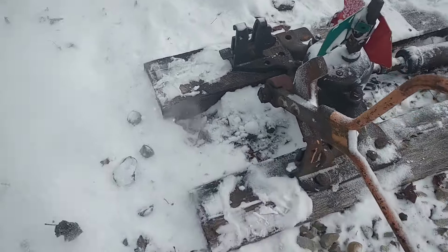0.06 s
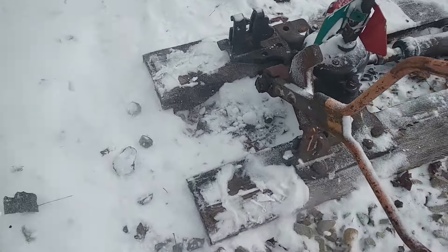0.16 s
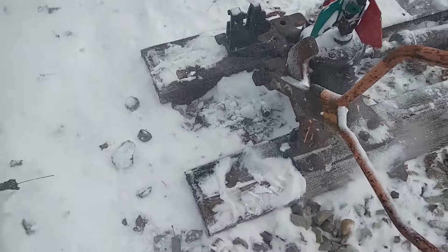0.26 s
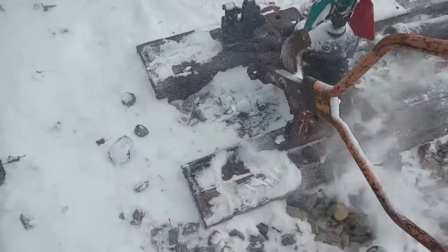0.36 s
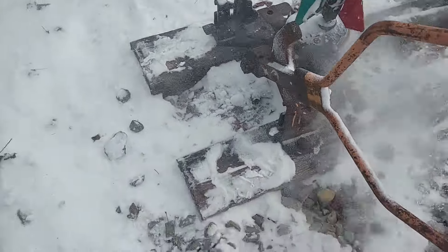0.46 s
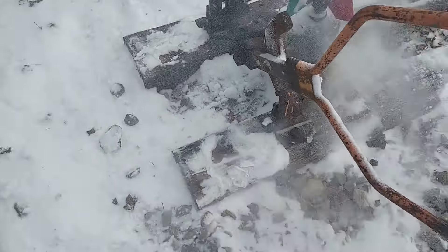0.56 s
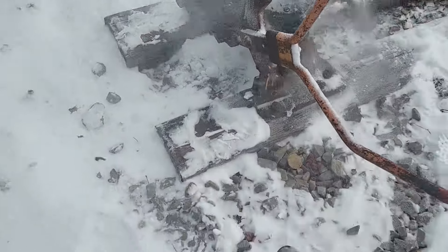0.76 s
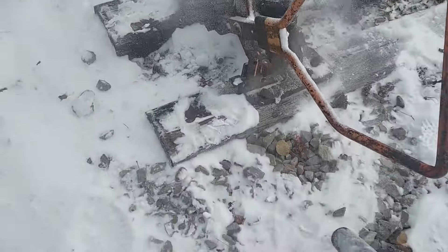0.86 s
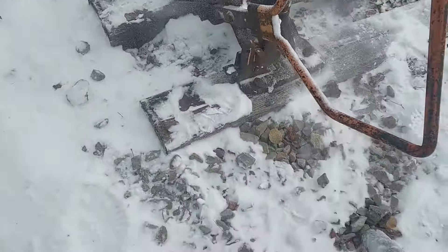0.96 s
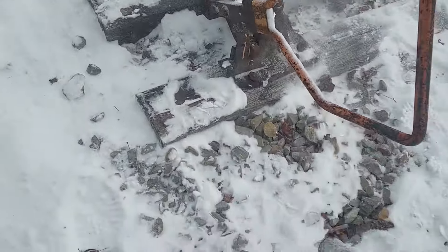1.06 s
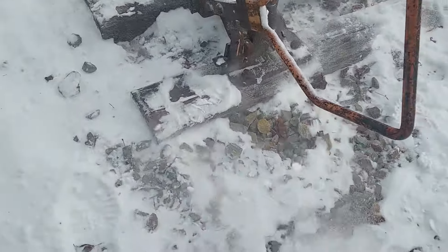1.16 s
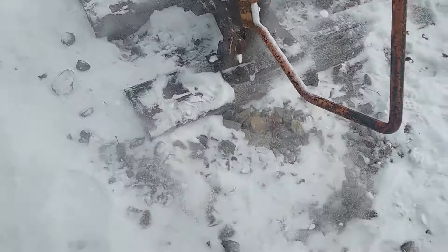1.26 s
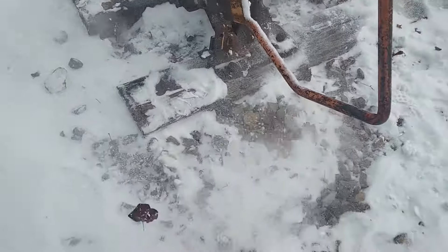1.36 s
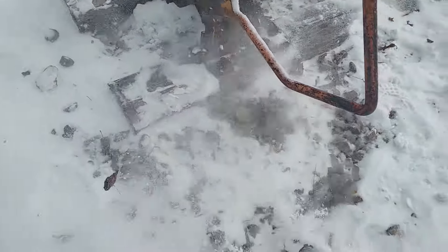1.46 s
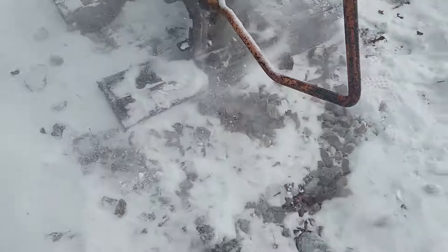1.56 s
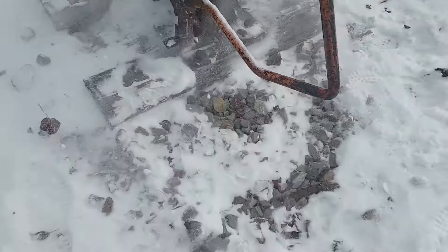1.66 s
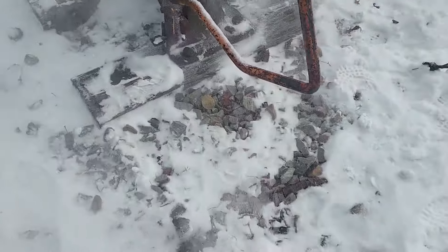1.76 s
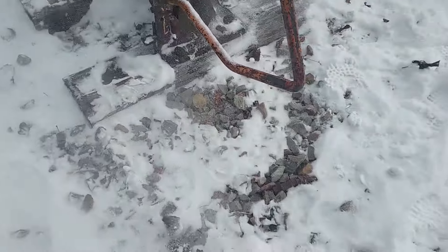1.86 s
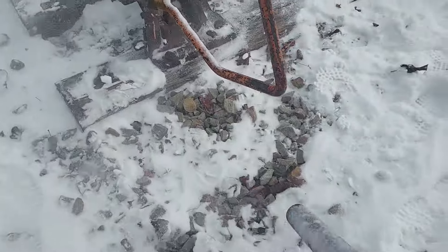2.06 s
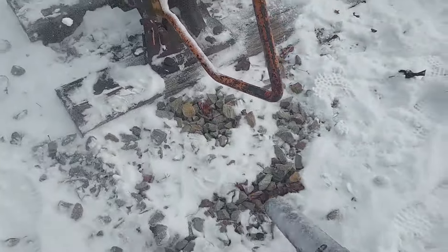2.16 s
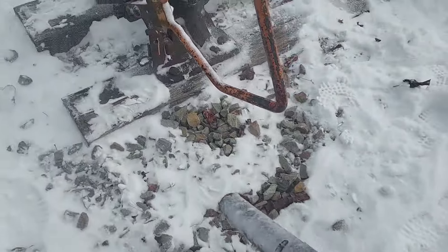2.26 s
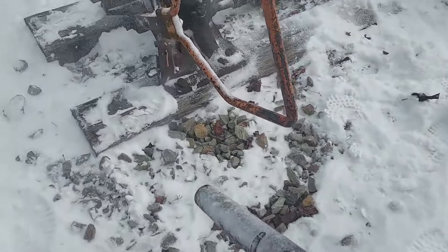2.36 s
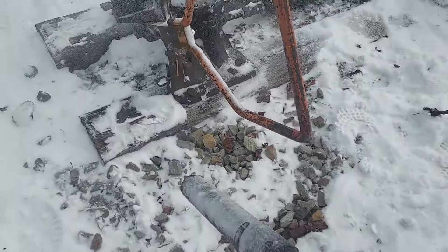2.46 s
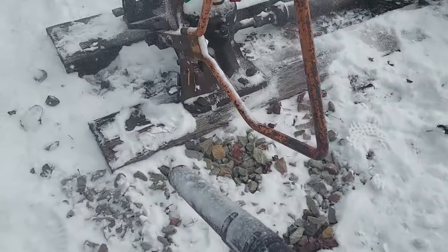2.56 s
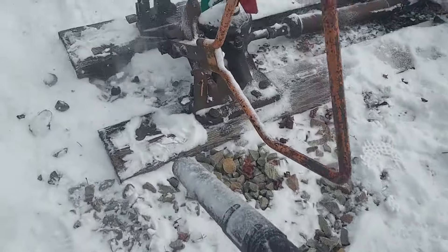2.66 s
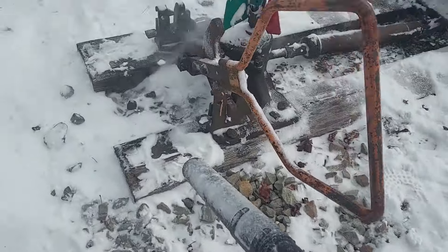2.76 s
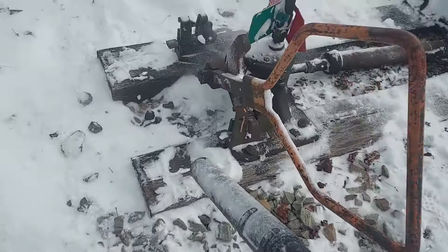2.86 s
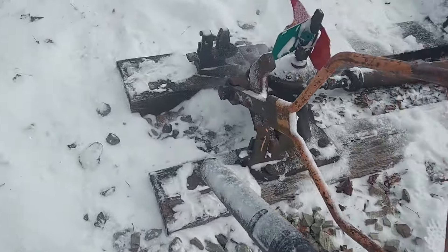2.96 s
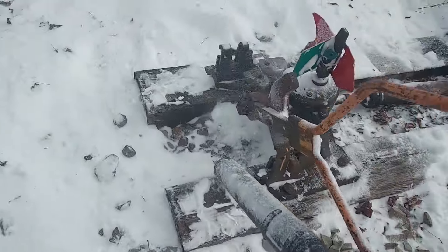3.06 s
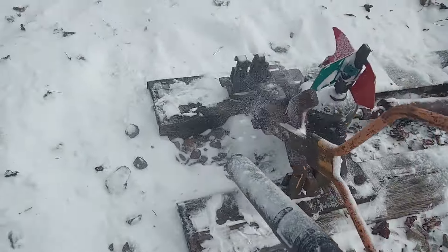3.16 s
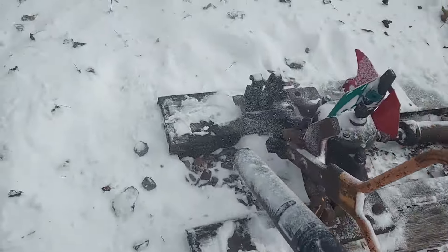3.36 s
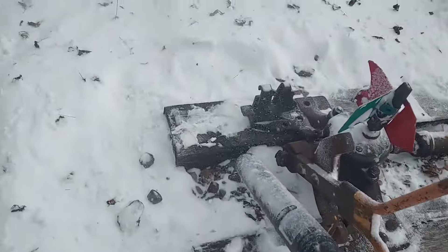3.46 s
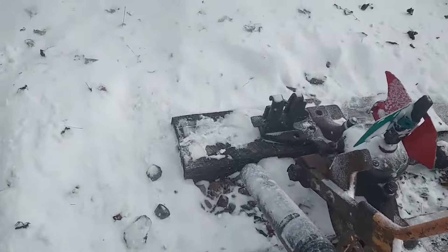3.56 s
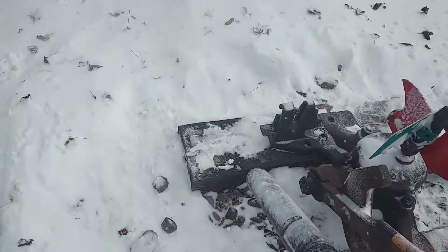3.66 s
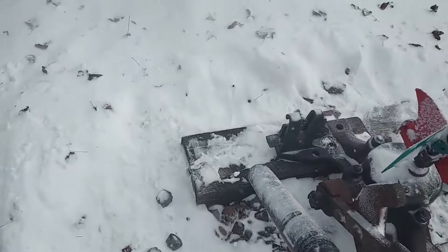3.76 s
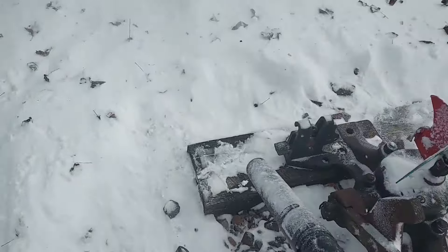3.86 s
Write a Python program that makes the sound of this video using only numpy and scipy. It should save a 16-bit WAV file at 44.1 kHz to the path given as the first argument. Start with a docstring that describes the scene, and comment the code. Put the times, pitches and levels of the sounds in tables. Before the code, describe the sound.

Loud and close, a leaf blower drones outdoors at a nearly constant pitch, mixing a petrol engine's buzz with rushing air and thin whistles that come and go. A little wind rumble touches the microphone, mostly on the left. Late on, the motor stumbles and sags briefly, then climbs back to speed amid several low thumps of air.

```python
"""A loud buzz, whine and roar: a petrol backpack blower runs flat out, close to two microphone ports.
One cylinder fires on every turn, a fourteen-blade fan whines on the same shaft, air roars from the tube.
Near the end the engine misses a few firings, sags and picks up again; stray air buffets the left port.
The engine sound is a stack of "orders": order 3 is a tone that vibrates three times per shaft turn."""
import sys
import numpy as np
from scipy import signal
from scipy.fft import rfft, irfft
from scipy.io import wavfile
from scipy.ndimage import uniform_filter1d

SR = 44100
rng = np.random.default_rng(int(sys.argv[2]) if len(sys.argv) > 2 else 0)


def output_pcm(signal):
    """Save a mono or channel-first signal as 16-bit PCM at the path in sys.argv[1].

    Samples are clipped to [-1, 1] before scaling.
    """
    pcm = np.clip(np.atleast_2d(signal).T, -1, 1) * 32767
    wavfile.write(sys.argv[1], SR, np.round(pcm).astype(np.int16))


N = 391519
HOP, WINDOW = 256, 1024  # samples between frames, samples in one slice of noise
TONE_TIMES, NOISE_TIMES = (np.arange(N // HOP + extra) * HOP / SR for extra in (2, 5))
NOISE_HZ = np.fft.rfftfreq(WINDOW, 1 / SR)
BLADES, ORDERS = 14, np.arange(1, 57)

# Shaft speed, nearly steady until the sag after the missed firings: time_s, turns_hz
SHAFT_SPEED = [(0.0, 114.2), (0.12, 113.5), (0.22, 114.0), (0.64, 113.6), (0.84, 114.2), (1.41, 113.6),
               (1.56, 114.2), (1.67, 113.4), (1.85, 114.2), (2.2, 113.5), (2.59, 114.3), (2.91, 113.9),
               (3.21, 114.4), (3.34, 113.6), (3.58, 114.5), (3.68, 113.8), (3.85, 114.2), (4.0, 113.7),
               (4.15, 114.4), (4.25, 113.8), (4.4, 114.9), (4.5, 114.1), (4.81, 114.3), (4.91, 115.4),
               (5.16, 115.0), (5.26, 115.6), (5.44, 114.0), (6.0, 114.2), (6.07, 114.8), (6.27, 115.1),
               (6.82, 113.4), (7.11, 114.0), (7.21, 113.1), (7.27, 113.1), (7.36, 104.8), (7.44, 101.5),
               (7.5, 102.7), (7.58, 106.8), (7.68, 110.3), (7.76, 111.3), (8.2, 112.2), (8.35, 109.9),
               (8.4, 110.0), (8.57, 112.8), (8.87, 113.9)]
# How the air roar and casing buzz change; roar and lean count only as changes from their average.
# The treble band is a faint high band near 9 kHz that slowly swells and fades:
# time_s, roar_db, lean_left_db, treble_band_db, buzz_left_db, buzz_right_db
ROAR_AND_BUZZ = [(0.0, -25, -4, -14, -71, -40.5), (0.5, -25.5, -3, -11, -58, -45),
                 (1.3, -24.5, -6, -10, -46, -45), (1.9, -24, -6, -11, -47.5, -44),
                 (2.55, -23.5, -5, -6.5, -50, -42), (3.1, -23.5, -8.5, -3.5, -44.5, -41.5),
                 (3.63, -22, -5.5, -1.5, -47, -38), (4.15, -24, -7, -7, -47, -39.5),
                 (4.8, -25.5, -3.5, -10, -52, -39.5), (5.3, -23.5, -6, -11, -73, -39),
                 (6.0, -23, -5, -12, -63, -38.5), (6.25, -25, -7, -6, -43, -40),
                 (7.15, -24, -4, -10, -63, -39), (7.47, -25, -5, -12, -35, -34),
                 (7.81, -23.5, -6, -2, -49, -42), (8.33, -24, -7, -6, -38.5, -40.5),
                 (8.88, -25, -4, -3, -46, -40.5)]
# How alike left and right sound: pitch_hz, likeness (1 = the same, 0 = unrelated, below 0 = opposed)
LIKENESS = [(60, -0.33), (130, 1), (290, 0.96), (640, 1), (1410, 0.65), (3100, -0.15), (6820, -0.028),
            (15000, 0.027)]


def gain_of(db):
    """Turns decibels into a factor to multiply by."""
    return 10 ** (np.asarray(db) / 20)


def evened(x):
    """Scales a signal to an average power of 1."""
    return x / np.sqrt(np.mean(abs(x) ** 2) + 1e-20)


def at_pitch(points, hz):
    """Looks up a (pitch_hz, value) table at the given pitches."""
    pitch_hz, value = np.transpose(points)
    return np.interp(np.log(hz + 1), np.log(pitch_hz + 1), value)


def columns(rows, at):
    """Looks up a table by its first column and gives a curve for each of the others."""
    first, *values = np.transpose(rows)
    return [np.interp(at, first, value) for value in values]


def lifts(hz, peaks):
    """Adds up resonances in dB; each lifts or lowers the sound near its own pitch."""
    return sum(db / (1 + (2 * (hz - pitch_hz) / width_hz) ** 2) for pitch_hz, width_hz, db in peaks)


def drift(rate_hz, count=1):
    """Smooth random curves of complex numbers, one value a frame."""
    frames = len(TONE_TIMES)
    spectrum = rfft(rng.standard_normal((2, count, frames)))
    real, imag = irfft(spectrum / (1 + (np.fft.rfftfreq(frames, HOP / SR) / rate_hz) ** 2), frames)
    return evened(real + 1j * imag)


def ports(hz, lean_db=0):
    """Left and right gain and phase: the body casts a shadow and each port colours the sound."""
    louder_left = [(60, 9), (99, 7), (160, -13.5), (270, 5.5), (450, -3.5), (740, -2), (1220, -8),
                   (2010, -7.5), (3330, -5.5), (5500, 8), (9080, -1.5), (15000, 0)]  # left level minus right: pitch_hz, lean_db
    earlier_left = [(100, 1), (250, 0.11), (600, 0.62), (1000, 0.6), (1400, 1.57), (2300, 1.34),
                    (3000, 2.5), (15000, 2.5)]  # how far the left wave is ahead: pitch_hz, lead_radians
    half = gain_of((at_pitch(louder_left, hz) + lean_db) / 2) * np.exp(.5j * at_pitch(earlier_left, hz))
    return np.array([half, 1 / half]) / np.sqrt((abs(half) ** 2 + abs(half) ** -2) / 2)


def noise(gains, likeness):
    """Stereo noise shaped by gains (side x pitch x frame)."""
    a, b, c, d = rng.standard_normal((gains.shape[-1], len(NOISE_HZ), 4)).T
    left, likeness = a + 1j * b, np.clip(likeness, -1, 1)[:, None]
    right = likeness * left + np.sqrt(1 - likeness ** 2) * (c + 1j * d)
    return signal.istft(np.array([left, right]) * gains, nperseg=WINDOW, noverlap=WINDOW - HOP)[1][:, :N]


def shaft():
    """The shaft's angle in radians; it spins a little unevenly from turn to turn."""
    t = np.arange(N) / SR
    turns_hz = columns(SHAFT_SPEED, t)[0]
    uneven = np.interp(t, TONE_TIMES, drift(rate_hz=23.06)[0].real)
    return 2 * np.pi * np.cumsum(turns_hz * (1 + .0022 * uneven)) / SR


def fan_whine(sag_db):
    """Left and right dB of the tone of the passing blades; the shadowed left hears it faint and wavering."""
    right_whine = [(0.0, -35), (0.1, -28), (0.14, -40), (0.39, -27), (0.44, -22), (0.55, -31), (0.61, -28),
                   (0.66, -22.5), (0.77, -20), (0.87, -17), (0.93, -19.5), (0.98, -43), (1.2, -44),
                   (1.25, -23), (1.32, -21), (1.4, -22), (1.43, -40), (1.82, -37), (1.87, -21),
                   (1.96, -23.5), (2.0, -49), (2.09, -43), (2.13, -23), (2.2, -24.5), (2.33, -47),
                   (2.63, -42), (2.71, -24), (2.78, -32), (3.1, -40), (3.7, -34), (3.95, -24), (4.02, -18),
                   (4.2, -19), (4.4, -20), (4.5, -38), (4.58, -20.5), (4.64, -18), (4.74, -20.5),
                   (4.78, -31), (4.95, -23), (5.25, -23.5), (5.38, -31), (5.52, -34), (5.62, -19.5),
                   (5.72, -18.5), (5.85, -19), (6.08, -20), (6.11, -23), (6.18, -38), (6.3, -23.5),
                   (6.9, -22.5), (7.15, -24), (7.22, -30), (7.25, -22), (7.285, -34), (7.31, -29),
                   (7.45, -38), (7.65, -40), (7.75, -27), (7.86, -32), (7.9, -43), (7.94, -28), (8.05, -30),
                   (8.14, -42), (8.28, -34), (8.38, -44), (8.46, -30), (8.6, -25), (8.75, -29), (8.87, -32)]  # blade tone at the right port: time_s, level_db
    right_gain = columns([(s, gain_of(db)) for s, db in right_whine], TONE_TIMES)[0]
    return [-35.5 + sag_db + 1.5 * drift(rate_hz=2.2)[0].real, 20 * np.log10(right_gain)]


def exhaust():
    """Levels in dB of orders 1 to 13, the exhaust note; each wavers from firing to firing."""
    # The note as the operator turns: time_s, then level_db of orders 1, 2, 3, 5, 7, 8
    main_orders = [(0.0, -34, -27.5, -24.5, -28.5, -35, -31), (0.4, -35, -33.5, -25, -27, -62, -62),
                   (1.2, -34, -33.5, -24.5, -30, -44, -56), (1.45, -33.5, -32.5, -22.5, -28, -36, -43),
                   (1.75, -33.5, -27, -20.5, -31.5, -35.5, -41), (2.2, -37, -26.5, -21, -27.5, -59, -41),
                   (2.85, -35.5, -23.5, -20, -25, -33, -34), (3.1, -34.5, -24.5, -19.5, -29.5, -37, -52),
                   (3.5, -32, -25.5, -22.5, -28, -37, -40), (3.85, -37, -19.5, -20, -25.5, -34, -30),
                   (4.2, -41, -19, -21.5, -31, -32, -49), (4.5, -39, -20.5, -20, -28.5, -29, -34),
                   (4.72, -47, -22.5, -21, -27, -34, -36), (5.0, -37.5, -20.5, -22, -34, -29, -36),
                   (5.35, -37, -17.5, -22, -30, -32, -35), (5.62, -34.5, -18, -23, -25.5, -36, -30),
                   (6.0, -49, -20, -23.5, -30.5, -34, -33), (6.6, -42, -20.5, -20.5, -29, -33, -33),
                   (7.2, -51, -25.5, -21, -28, -58, -40), (7.46, -50, -25.5, -19, -23, -44, -42),
                   (7.9, -49, -26, -19.5, -26, -35, -43), (8.2, -35, -30.5, -21.5, -24, -33, -37),
                   (8.45, -43, -40, -21.5, -21.5, -46, -56), (8.87, -29.5, -27, -18, -26.5, -44, -42)]
    # The tones between and above: time_s, then level_db of orders 4, 6, 9 and of each of 10 to 13
    middle_orders = [(0.0, -32, -38, -41, -43), (0.75, -35, -36, -41, -42), (1.25, -36, -37, -39, -41),
                     (1.75, -30, -35, -39, -40), (2.25, -33, -37, -38, -39), (2.75, -36, -35, -37, -37),
                     (3.25, -39, -36, -38, -37), (3.75, -29.5, -39, -38, -37), (4.25, -37, -41, -35, -41),
                     (4.75, -39, -44, -38, -42), (5.25, -39, -42, -38, -44), (5.75, -41, -44, -36, -43),
                     (6.25, -41, -46, -38, -43), (6.75, -35, -46, -38, -41), (7.25, -37, -42, -35, -43),
                     (7.5, -37, -35, -36, -44), (7.9, -36, -38, -40, -42), (8.3, -32, -40, -42, -44),
                     (8.6, -32, -40, -41, -42), (8.88, -29, -40, -40, -41)]
    first, second, third, fifth, seventh, eighth = columns(main_orders, TONE_TIMES)
    fourth, sixth, ninth, above = columns(middle_orders, TONE_TIMES)
    level_db = np.array([first, second, third, fourth, fifth, sixth, seventh, eighth, ninth] + 4 * [above])
    return level_db + missed_firings(TONE_TIMES) + 1.2 * drift(rate_hz=31, count=13).real


def casing_buzz(turns_hz, sag_db, port_db):
    """The casing's buzz: each order's level in dB, and the share of it that wanders."""
    buzz_orders = [(15, 2, 0.86), (16.4, -2, 1), (18.2, 2.5, 0.16), (20.8, -3, 0.83), (24.6, 0.5, 0.83),
                   (29.5, -2, 0.96), (42, -8, 0.98), (45, -7.5, 1), (49.4, -10, 1), (52.7, -10.5, 1),
                   (53, -15.5, 0.77)]  # tones above the blade tone: order, offset_db, wander_share (0 to 1)
    panels = [(3227, 19, 16), (3420, 80, -3.5), (4640, 96, -4), (6170, 100, 6)]  # panel resonances colour any order crossing them: pitch_hz, width_hz, lift_db
    offset_db, wander_share = columns(buzz_orders, ORDERS)
    colour_db = offset_db[:, None] + lifts(ORDERS[:, None] * turns_hz, panels)
    lean_db = port_db - port_db[:, [2 * BLADES - 1]]  # the buzz curves already hold the lean at order 28
    buzz_db = np.array(columns(ROAR_AND_BUZZ, TONE_TIMES)[3:])[:, None] + sag_db
    follow = np.clip(ORDERS / 18, 0, 1)[:, None]  # higher orders follow the curves fully
    buzz_db = buzz_db.mean(2, keepdims=True) * (1 - follow) + buzz_db * follow
    return colour_db + lean_db + buzz_db, wander_share


def engine(angle):
    """Low orders keep in step, so each firing is one pulse; high ones wander as paths to the ports change."""
    overtones = [(2, -2), (3, -12)]  # overtones of the blade tone: multiple, lift_db
    turns_hz = columns(SHAFT_SPEED, TONE_TIMES)[0]
    order_hz = ORDERS * turns_hz.mean()
    sag_db = 1.5 * np.minimum(turns_hz - 114, 0)  # fades as the shaft drops below full speed, 114 Hz
    port = ports(order_hz)[:, :, None]
    port_db = 20 * np.log10(abs(port))
    level_db, wander_share = casing_buzz(turns_hz, sag_db, port_db)  # row 0 is order 1
    level_db[:, BLADES - 1], wander_share[BLADES - 1] = fan_whine(sag_db), .12
    for multiple, db in overtones:
        level_db[:, int(multiple) * BLADES - 1] += db
    level_db[:, :13] = exhaust() + port_db[:, :13]
    wander_share[:8] = .1
    wander_share[3:6:2] = wander_share[8:13] = .25  # the middle orders come and go more
    both, left, right = (drift(rate_hz=1.87, count=len(ORDERS)) for _ in range(3))
    likeness = np.clip(at_pitch(LIKENESS, order_hz), 0, 1)[:, None]
    wander = np.sqrt(likeness) * both + np.sqrt(1 - likeness) * np.array([left, right])
    pulse_phase = .02 * ORDERS ** 2 - 1.3  # push then pull, spread out by the muffler
    steady = np.sqrt(1 - wander_share ** 2) * np.exp(1j * pulse_phase)
    strengths = gain_of(level_db) * (steady[:, None] + wander_share[:, None] * wander) * port / abs(port)
    strengths[:, BLADES - 1] *= gain_of(1.5 * drift(rate_hz=21)[0].real)  # uneven inflow shakes the whine
    add_whistles(strengths)
    turn, tone, sound = np.exp(1j * angle), np.ones(N), np.zeros((2, N))
    ramp = np.arange(HOP) / HOP
    for strength in strengths.transpose(1, 0, 2):
        tone = tone * turn  # step up to the next order
        glide = strength[:, :-1, None] + np.diff(strength)[:, :, None] * ramp
        sound += (glide.reshape(2, -1)[:, :N] * tone).real
    return np.sqrt(2) * sound


def tube_colour(hz, t):
    """The tube's hollow sound in dB: steady resonances, changing ones and brief swells."""
    resonances = [(322, 214, 6), (598.5, 39, 8.5), (813, 200, 4), (1400, 59, -3), (1597, 690, 6.5),
                  (3320, 1500, 2.5)]  # steady: pitch_hz, width_hz, lift_db
    hollow = [(0.0, 3, -2, 2.5), (0.4, 1, 0, -5), (1.0, -1.5, -0.5, -3), (1.6, 3, 3, -2.5),
              (2.2, 0, 0.5, -1), (2.8, 3.5, 1, 3), (3.9, 0.5, 0, -1.5), (5.0, 0, 3, 1.5), (5.4, -2, 4, 0.5),
              (6.1, -4.5, 3, -1.5), (6.6, -3.5, -3, 1), (7.2, 1.5, 5, -2.5), (7.9, 1, -2, 5.5),
              (8.45, 6, 3.5, -1.5), (8.88, -1.5, 0, 4.5)]  # two resonances and a band of rush: time_s, lower_db, upper_db, rush_db
    swells = [(1.036, 0.06, 610, 50, 12), (2.7, .06, 630, 50, 1), (3.706, .1, 617, 50, 4),
              (4.48, .06, 800, 70, 5), (6.18, .17, 5960, 60, 3), (7.45, .07, 655, 80, 10),
              (7.85, .1, 2700, 300, 4), (7.95, .12, 3600, 400, 5), (8.1, .15, 3030, 200, 4),
              (8.6, 0.3, 3300, 700, 6)]  # brief resonances: middle_s, half_length_s, pitch_hz, width_hz, lift_db
    lower_db, upper_db, rush_db = columns(hollow, t)
    colour_db = lifts(hz, [(620, 144, lower_db), (960, 100, upper_db), (1270, 350, rush_db)])
    for middle_s, half_s, *peak in swells:
        colour_db += lifts(hz, [peak]) * np.exp(-((t - middle_s) / half_s) ** 2)
    return colour_db + lifts(hz, resonances)


def air_roar(angle):
    """The jet and fan make a patchy roar, coloured by the tube and puffing once a turn."""
    roar_shape = [(40, -52), (120, -38), (200, -6), (450, -7.5), (1000, -9), (2200, -13), (4000, -18),
                  (6000, -21.5), (6900, -30.5), (7700, -50), (8400, -30.5), (9300, -23.5), (12500, -28.5),
                  (15800, -23.5)]  # tone balance (microphones are deaf near 7.7 kHz): pitch_hz, relative_db
    hisses = [(4550, 45, 2), (4860, 79, 6.5), (6040, 44, 6)]  # fuzzy whistles that come and go: pitch_hz, width_hz, greatest_lift_db
    hz, t = NOISE_HZ[:, None], NOISE_TIMES
    change_db, lean_db, treble_band_db = columns(ROAR_AND_BUZZ, t)[:3]
    change_db, lean_db = change_db - change_db.mean(), lean_db - lean_db.mean()
    speckle = rng.standard_normal((2, len(hz), len(t)))
    patches = evened(uniform_filter1d(uniform_filter1d(speckle, 14, axis=1), 20, axis=2))
    jet_band = np.clip((6500 - hz) / 1500, .2, 1)  # the top treble hardly follows the jet
    low_band = 1 / (1 + (hz / 1200) ** 4)
    treble_band = np.exp(-((hz - 9300) / 1500) ** 2)
    level_db = at_pitch(roar_shape, hz) + tube_colour(hz, t) + 1.63 * patches
    level_db += treble_band * treble_band_db
    level_db += (jet_band - .98 * low_band) * change_db  # the low rush holds nearly steady
    level_db += .072 * low_band * missed_firings(t)
    for hiss, wave in zip(hisses, drift(rate_hz=.34, count=len(hisses))):
        level_db += lifts(hz, [hiss]) * np.resize(np.minimum(abs(wave), 1), len(t))
    roar = evened(noise(gain_of(level_db) * ports(hz, jet_band * lean_db), at_pitch(LIKENESS, NOISE_HZ)))
    bright = signal.sosfilt(signal.butter(1, [2200, 10000], "band", fs=SR, output="sos"), roar)
    puff = .17 * np.cos(angle - 3.3) + .1 * np.cos(2 * angle - .4)
    return gain_of(-20.5) * (roar + puff * bright)


def wind_rumble():
    """Stray air buffets the ports with a lumpy rumble, mostly on the left."""
    buffeting = [(0.0, -37), (0.25, -45), (2.1, -46), (2.25, -37), (2.37, -35), (2.45, -41), (3.3, -44),
                 (4.5, -45.5), (5.1, -52), (6.3, -50), (7.1, -46.5), (7.37, -37), (7.51, -33), (7.6, -38),
                 (7.7, -34), (7.8, -33), (7.97, -26), (8.05, -42), (8.2, -34), (8.58, -34), (8.7, -41),
                 (8.88, -43)]  # strength of the buffeting: time_s, relative_db
    rumble_shape = [(20, -28), (32, -24), (45, 7), (70, 14), (140, 19), (250, -10), (500, -35), (2000, -82)]  # its tone balance: pitch_hz, relative_db
    lumps = evened(uniform_filter1d(rng.standard_normal((2, 1, len(NOISE_TIMES))), 4, axis=2))
    level_db = columns(buffeting, NOISE_TIMES)[0] + 2.4 * lumps + [[[7.]], [[-5.]]]  # left, right
    shape = gain_of(at_pitch(rumble_shape, NOISE_HZ))
    return noise(shape[:, None] / np.linalg.norm(shape) * gain_of(level_db), likeness=0 * NOISE_HZ)


def add_whistles(strengths):
    """Makes single engine orders sing out for a moment as rough whistles."""
    whistles = [(0.5, 0.3, 28, -41, -35), (1.1, 0.38, 28, -39, -34.5), (2.0, 0.3, 28, -43, -34),
                (2.55, .15, 28, -38, -33), (3.0, 0.4, 28, -37, -43), (3.55, .12, 28, -38, -44),
                (5.12, 0.25, 28, -36, -36), (5.75, 0.3, 28, -42, -36), (6.25, .2, 28, -39, -40),
                (2.5, .25, 31, -40, -38), (3.2, 0.15, 31, -38, -38), (3.52, .1, 31, -38, -42),
                (4.7, 0.12, 31, -40, -39), (5.8, 0.15, 31, -41, -35), (3.6, .2, 30, -46, -36),
                (5.15, .22, 30, -46, -38), (6.2, .2, 30, -45, -39), (2.35, .3, 27, -46, -38),
                (8.64, .12, 27, -42, -32), (6.95, .3, 24, -41, -36), (7.22, .08, 24, -40, -33),
                (7.5, .08, 30, -39, -36), (6.19, 0.16, 52, -40, -49), (3.85, .45, 39, -44, -45),
                (3.8, .3, 40, -45, -46), (5.9, .5, 39, -45, -45), (5.6, .4, 36, -44, -43),
                (7.46, .03, 56, -39, -46), (7.85, 0.2, 29, -36, -32), (8.22, .17, 29, -38, -31),
                (8.51, 0.11, 29, -35, -28), (8.72, .1, 29, -38, -33), (7.8, .12, 31, -42, -35),
                (7.8, .1, 24, -42, -34), (8.3, .05, 31, -42, -35), (8.65, .12, 28, -42, -36),
                (5.2, .2, 21, -45, -38), (8.5, 0.3, 19, -42, -35)]  # one whistle a row: middle_s, half_length_s, order, left_db, right_db
    flutter = (1 + .35 * drift(rate_hz=28, count=len(ORDERS))) / 1.03
    for middle_s, half_s, order, *sides_db in whistles:
        row = round(order) - 1
        fade = np.exp(-((TONE_TIMES - middle_s) / half_s) ** 4)
        whistle = gain_of(sides_db)[:, None] * [[1j], [1]] * flutter[row]  # sides a quarter cycle apart
        strengths[:, row] += fade * (whistle - strengths[:, row])


def wind_thumps():
    """Stray air thumps the left port most: a short low note with a slow pressure push under it."""
    thumps = [(2.239, -31, 86.1), (2.329, -27, 91.5), (7.357, -33, 100), (7.389, -38, 140),
              (7.498, -26, 83.6), (7.685, -22, 125), (7.775, -23, 126), (7.84, -38, 101), (7.92, -22, 75),
              (7.975, -30, 74.6), (8.245, -23, 62.0), (8.58, -27, 99.8)]  # one thump a row: start_s, relative_db, pitch_hz
    push_db, push_s = -3, .0038
    sound = np.zeros(N)
    for start_s, db, pitch_hz in thumps:
        age_s = np.arange(N) / SR - start_s
        rise = np.clip(age_s * pitch_hz / .65, 0, 30)  # peaks within one cycle, then falls quickly
        sound += gain_of(db) * rise * np.exp(1 - rise) * np.sin(2 * np.pi * pitch_hz * age_s)
        push = np.clip(age_s / push_s, 0, 30)
        sound += gain_of(db + push_db) * push * (2 - push) * np.exp(1 - push)
    return sound * gain_of([[4.5], [-12.]])  # left, right


def missed_firings(t):
    """The brief dips in dB when the cylinder fires weakly."""
    misses = [(7.3, .023, -24), (7.78, .012, -3), (8.21, .025, -5), (8.3, .008, -7), (8.44, .015, -6)]  # one weak firing a row: middle_s, half_length_s, dip_db
    return sum(db * np.exp(-((t - middle_s) / half_s) ** 2) for middle_s, half_s, db in misses)


def scene():
    """Engine, air and wind together at the two ports."""
    angle = shaft()
    return engine(angle) + air_roar(angle) + wind_rumble() + wind_thumps()


def record(dry):
    """The microphone input rounds off the highest peaks and loses the deepest bass and the top treble."""
    low_cut_hz, high_cut_hz = 35, 15850
    soft = 1.508 * np.tanh(dry / 1.48)
    soft = signal.sosfilt(signal.butter(2, low_cut_hz, "high", fs=SR, output="sos"), soft)
    treble_cut = signal.firwin(511, high_cut_hz, window=("kaiser", 9), fs=SR)
    return signal.oaconvolve(soft, treble_cut[None], "same")


dry = scene()
out = record(dry)
output_pcm(out)
```